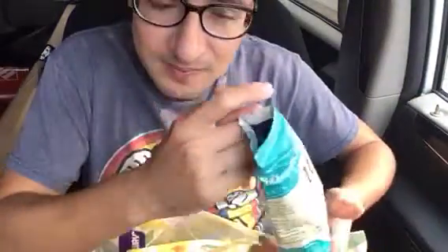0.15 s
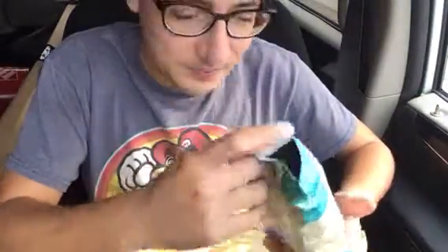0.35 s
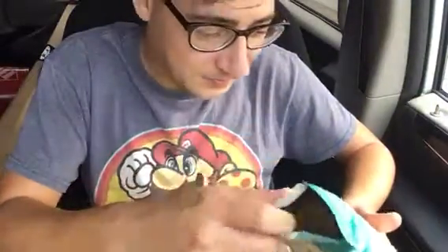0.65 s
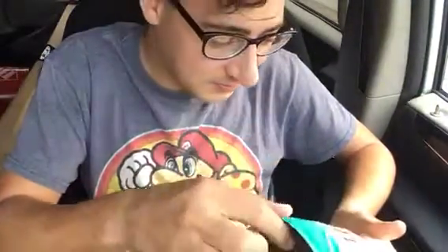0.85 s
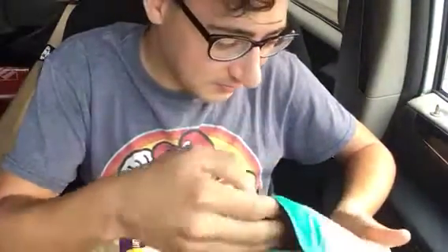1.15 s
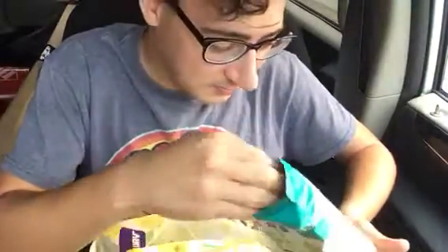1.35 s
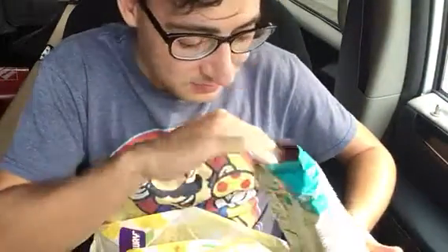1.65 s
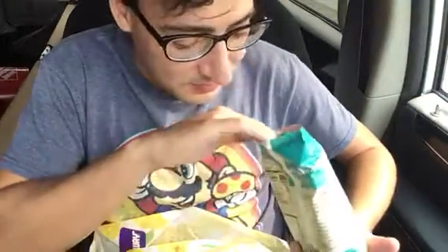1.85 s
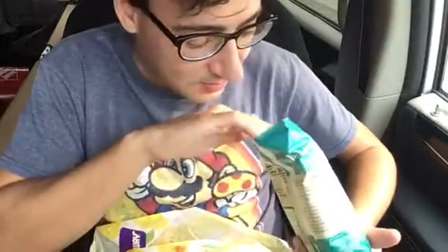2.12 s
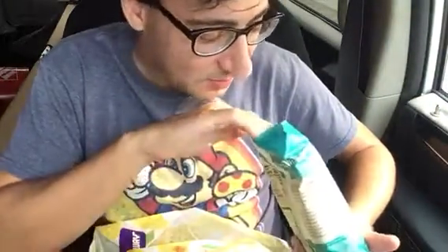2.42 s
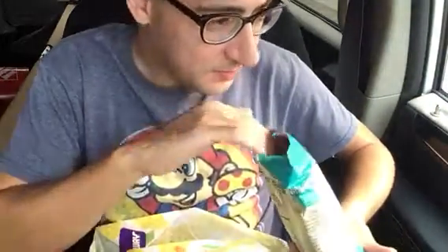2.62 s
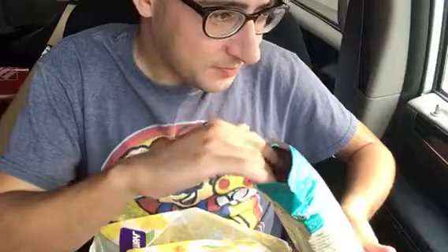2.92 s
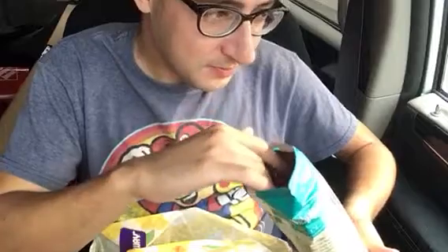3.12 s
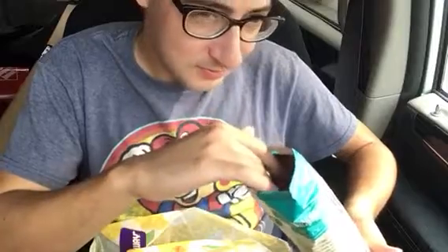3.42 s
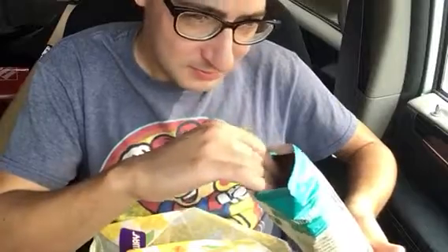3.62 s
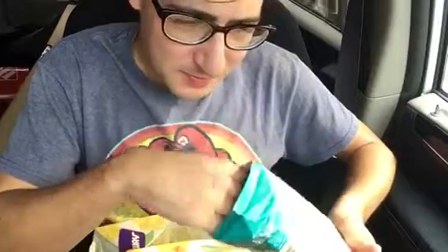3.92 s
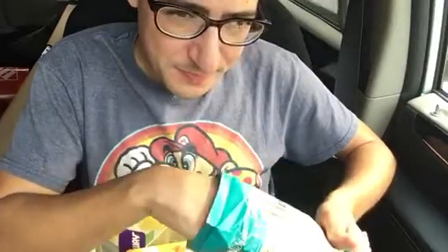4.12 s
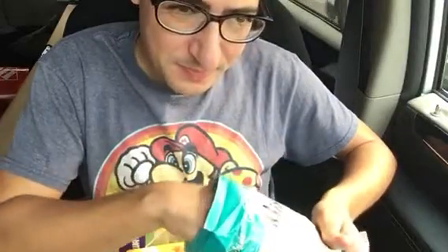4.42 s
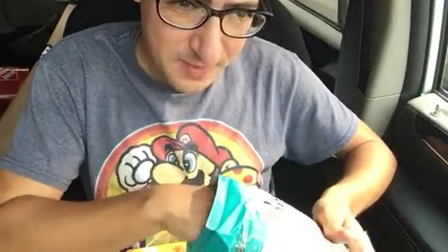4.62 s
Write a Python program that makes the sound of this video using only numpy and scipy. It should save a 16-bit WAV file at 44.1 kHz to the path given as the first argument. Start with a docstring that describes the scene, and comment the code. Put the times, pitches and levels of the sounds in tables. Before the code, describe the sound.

Close microphone in a small, padded cabin: a crinkly snack bag is handled in irregular strokes. Dry snaps with a papery, slightly hollow ring mix with fine foil rustling. Activity swells, almost stops in the middle, gives one brief burst, then ends in the loudest, brightest crackles with a low flutter of the bag wall. Deep soft rumble swells in the later half.

```python
"""Hand in a foil-lined chip bag, parked vehicle

A hand rummages in the bag, close by. Creases buckle: noise cracks and decaying scatter ring film and hollow.
Between them skin slides on foil: fine random ticks over smooth rub noise, with a low flutter of the bag wall.
The upholstered cabin adds a short tail of decaying noise. Below lie a noise rumble that grows late,
a wavering sine boom in swells, strongest in the second half, and faint air hiss.
"""
import sys
import numpy as np
from scipy import signal
from scipy.fft import rfft, irfft
from scipy.io import wavfile
from scipy.ndimage import map_coordinates

SR = 44100
rng = np.random.default_rng(int(sys.argv[2]) if len(sys.argv) > 2 else 0)


def master(y):
    """Save y as 16-bit WAV."""
    cut = np.clip(np.atleast_2d(y).T, -1, 1)
    pcm = np.round(cut * 32767)  # scale
    wavfile.write(sys.argv[1], SR, pcm.astype(np.int16))


N = 209871
TIME = np.arange(N) / SR

# buckling creases: t/s, film level/dB, hollow re film/dB, foil treble re film/dB, main resonance f/Hz
CREASE_SNAPS = [(0.028, -55, -7, 4.5, 8040), (0.0536, -68, -15, 8, 9500), (0.1192, -56.5, 5.5, -15, 1320),
                (0.1967, -57.5, -1, -23, 2080), (0.3003, -61.5, 7.5, -4, 1200),
                (0.3289, -54, -7, -0.5, 3470), (0.4313, -55.5, -6, 1, 9600), (0.5158, -58, 1, -2, 1140),
                (0.5485, -56, -21, 1, 3020), (0.561, -56, -11, 7.5, 1200), (0.5924, -45.5, -2, 9, 6960),
                (0.6035, -46.5, -7, -3, 3250), (0.7808, -47, -2.5, -22, 2220),
                (0.8173, -44.5, -22, -3, 2140), (0.8456, -45.5, -6.5, -3.5, 2820),
                (0.9294, -55.5, 5, -4, 1480), (0.9611, -48, -6.5, -2.5, 2200),
                (0.9886, -55, -1.5, -6, 1300), (1.083, -65, 13.5, -10, 1200), (1.1986, -57, 0, 10, 1220),
                (1.2405, -44.5, 0.5, -11, 1180), (1.2694, -42.5, -2.5, -1, 2380),
                (1.276, -42.5, -7, -13, 1340), (1.3121, -42, -3, -2.5, 1190), (1.3323, -46, 2, -16, 1560),
                (1.354, -48, -8, 0, 1108), (1.39, -52.5, -7, 8, 1100), (1.418, -43.5, -6, -3.5, 1240),
                (1.4348, -54, 0, -10, 1280), (1.442, -52.5, 8, -6, 1220), (1.4589, -47.5, -15, -3.5, 1880),
                (1.4843, -41, -3, -3, 1220), (1.598, -51, 5.5, -17, 1220), (1.67, -34, -6, 0, 1100),
                (1.7116, -43.5, -13, -3.5, 2900), (1.8106, -39, -0.5, 4, 1040),
                (1.8233, -41.5, -3, -5, 1080), (1.8413, -41.5, -1.5, -9, 804), (1.872, -40, 0, -3, 1110),
                (1.897, -49.5, 2, 2, 805), (1.9386, -44, -2, -13, 2500), (1.9548, -56, 12.5, -10, 940),
                (1.9947, -39.5, -5.5, 2, 1100), (2.0109, -37, -1, 0, 945), (2.0164, -44.5, -14, -2, 2740),
                (2.03, -46, -22, 4, 6300), (2.0673, -43.5, -3.5, 1, 991), (2.2237, -44.5, -2.5, -0.5, 930),
                (2.2993, -54, 0, -4, 1050), (2.3682, -62, 1.5, -0.5, 970), (2.708, -53, -3, 5, 1690),
                (2.7319, -48.5, -0.5, 0, 1070), (2.7557, -51.5, -3, -7, 2390),
                (2.7959, -46.5, -1, -2, 1290), (2.9283, -56, 8.5, -5, 1110), (2.9462, -64.5, 10, -15, 1100),
                (2.9678, -48, 0, -14, 2480), (3.033, -54.5, 6, -8, 1080), (3.0729, -43.5, -2, -1, 1020),
                (3.0848, -43.5, -1, 3, 880), (3.0885, -38, -1.5, 6, 960), (3.0945, -48, 8, 6, 960),
                (3.1185, -39.5, -3.5, -4, 2410), (3.2175, -59, 5, -15, 950), (3.3236, -61.5, 2, -2, 825),
                (3.3516, -51, 1, -12, 1740), (3.3606, -54.5, 6.5, -9, 1710), (3.395, -54, -3, -1, 2400),
                (3.5394, -45.5, -11, 2.5, 2650), (3.6356, -58, 3.5, -19, 2390), (3.648, -63, -5, -20, 2400),
                (3.8734, -54.5, 2, 7.5, 1110), (3.9007, -43.5, -2.5, -1, 1180),
                (3.9197, -38.5, 1.5, -6, 1100), (3.9347, -42, -1.5, 8, 1105), (3.9456, -38, -22, -6, 1670),
                (3.967, -39, -7.5, 0, 2670), (3.9884, -45.5, -1, 2, 1690), (4.0393, -42.5, -2.5, 0, 980),
                (4.077, -39.5, -5.5, -4.5, 4060), (4.1025, -42.5, 3.5, 3.5, 1195),
                (4.1283, -41.5, 1.5, -1, 1120), (4.1431, -34, -26, 5.5, 9800), (4.1634, -39, -7, 0, 9800),
                (4.171, -36, -7.5, 7, 9500), (4.188, -41.5, 1, 3, 1140), (4.2464, -30.5, -7, 7.5, 4120),
                (4.2587, -40.5, -7, -3, 1070), (4.2759, -46, 3.5, -21, 1230), (4.3297, -48, 1, -23, 1095),
                (4.3417, -41, -5, -9, 4160), (4.3744, -43.5, -8, -6, 1323), (4.3999, -33, -6.5, 0.5, 1211),
                (4.4717, -47, -2.5, -0.5, 1218), (4.4835, -51, -1, 7, 988), (4.5297, -47.5, -12, -20, 1000),
                (4.5672, -42, -4.5, -0.5, 1170), (4.6334, -47.5, -4, -2, 1280),
                (4.6899, -44.5, 4.5, -3, 1206), (4.6989, -36, -2, 0, 1310)]
# colour of the bag: f/Hz, level/dB
BAG_COLOUR = [(200, -3.5), (340, 1), (460, -9), (700, -1.5), (1000, -1.5), (1600, -4.5), (2500, 3),
              (4000, -1.5), (7000, -3), (9600, 0), (12500, 0), (15500, -5.5), (16500, -29)]
# resonances of the half-open bag: f/Hz, width/Hz, lift over the colour/dB (snaps take only a share of the lift)
BAG_RESONANCES = [(1137, 360, 13.5), (1770, 1200, 6), (3090, 98, 5.5), (3440, 620, 7), (4310, 450, 5.5),
                  (5600, 90, 4), (6240, 290, 1), (7800, 190, -3.5), (9700, 3200, 0.5), (10460, 610, -8.5),
                  (11900, 210, -0.5)]
# strokes of the hand: fastest t/s, rise/s, fall/s, film rustle level/dB, foil sizzle re film/dB
HAND_STROKES = [(0.23, 0.067, 0.11, -63.5, -1), (0.33, 0.063, 0.16, -62, -0.5),
                (0.58, 0.1, 0.15, -59.5, -4), (0.83, 0.16, 0.12, -56, -0.5), (1.0, .12, .15, -70.5, -1),
                (1.26, .25, .28, -52, -1.5), (1.74, 0.23, 0.28, -58, 1), (2.0, .08, 0.073, -53, 0.5),
                (2.19, 0.32, 0.19, -63, 0), (2.52, .15, 0.52, -71.5, -1), (2.74, 0.2, 0.24, -64, -1.5),
                (2.95, 0.1, 0.13, -64.5, -5.5), (3.1, 0.037, 0.052, -53, -3), (3.22, 0.056, 0.092, -69, -3),
                (3.37, 0.092, 0.062, -68, -10), (3.66, 0.041, 0.46, -78, 1), (3.96, 0.096, .17, -51, 1.5),
                (4.11, 0.063, .11, -49.5, -6), (4.17, .05, 0.11, -58, 6.5), (4.37, 0.099, 0.18, -55, 2),
                (4.59, 0.34, 0.36, -57, -1.5), (4.74, 0.19, .3, -50, -6)]
# colour of the rumble: f/Hz, level/dB
RUMBLE_SHAPE = [(18, -28), (30, -6.5), (42, -4), (55, 3.5), (72, -1), (95, -5), (120, -6), (140, -11.5),
                (205, -13.5), (250, -28), (350, -21), (450, -43), (900, -33), (2000, -56.5)]
# swells of the boom in the cabin air: loudest t/s, rise and fall/s, pitch f/Hz, level/dB
BOOM_SWELLS = [(.41, .4, 52.92, -48), (.75, .4, 58.3, -58), (2.8, .5, 59.1, -48.5), (3.22, .35, 61.08, -45),
               (3.47, .24, 59.44, -40.5), (4.05, 0.5, 58.25, -50), (4.56, 1.3, 61.5, -50.5)]
# colour of the faint cabin air: f/Hz, level/dB
AIR_COLOUR = [(300, 10.5), (600, 6.5), (1100, -6), (1800, -4.5), (4500, -12), (7000, -14), (9500, -9.5),
              (16000, -30)]

RUMBLE_DB, RUMBLE_GROWTH_DB, GROWTH_START_S = -49.3, 5.5, 3.6
BOOM_WAVER_HZ, WAVERS_PER_S = 2.32, 9
AIR_DB = -69.5
HOLLOW_TOP_HZ, FOIL_BOTTOM_HZ = 1700, 6000  # the film lies between
SNAP_LEVEL_S = .006  # snap levels hold over this first stretch
RING_S, RING_AT_DB, RING_HALVING_DB = 0.0058, -49, 41  # ring at that level; halves per so many dB more
CRACK_SHARE, CRACK_REF_DB = 0.11, -28  # power share in a weak snap; level that adds 1 before the cap
SMALL_PER_S, SMALL_DB, SMALL_SPREAD_DB = 15, -4.5, 7  # small creases: level re film rustle, scatter +/-
SMALL_HOLLOW_DB, SMALL_FOIL_DB, SMALL_HZ = 0.5, 6.5, 1296  # centres of their random values
REST_DB = -86.5  # rustle of the bag held still
TOP_HZ = 16200


def undb(db):
    """Decibels to gain."""
    return 10 ** (np.asarray(db) / 20)


def unit(x):
    """Scale to rms 1."""
    return x / np.sqrt(np.mean(x ** 2))


def colour(x, points, modes=(), size=16384):
    """Minimum-phase filter, via the cepstrum: (Hz, dB) outline plus resonances (Hz, width Hz, dB)."""
    f = np.fft.rfftfreq(size, 1 / SR)
    hz, db = np.transpose(points)
    shape_db = np.interp(np.log(f + 1), np.log(hz), db)
    for centre_hz, width_hz, lift_db in modes:
        shape_db = shape_db + lift_db / (1 + (2 * (f - centre_hz) / width_hz) ** 2)
    cepstrum = irfft(np.log(undb(shape_db)))
    # fold onto positive time: causal
    cepstrum[1:size // 2] *= 2
    cepstrum[size // 2 + 1:] = 0
    response = irfft(np.exp(rfft(cepstrum)))[:size // 2]
    return signal.fftconvolve(x, response)[:len(x)]


def band(x, edges_hz, kind, order=3):
    """Butterworth filter."""
    return signal.sosfilt(signal.butter(order, edges_hz, kind, fs=SR, output="sos"), x)


def swell(peak_s, rise_s, fall_s, db, round_top=0.26):
    """Power of a round-topped swell; its flanks steepen towards 20 dB per rise or fall time."""
    away = np.maximum((peak_s - TIME) / rise_s, (TIME - peak_s) / fall_s)
    return undb(db - 20 * (np.hypot(away, round_top) - round_top)) ** 2


def rumble():
    """Low rumble in the vehicle body: coloured noise that grows towards the end."""
    level_db = RUMBLE_DB + np.interp(TIME, [GROWTH_START_S, TIME[-1]], [0, RUMBLE_GROWTH_DB])
    return unit(colour(rng.standard_normal(N), RUMBLE_SHAPE)) * undb(level_db)


def boom():
    """Cabin air boom: a sine of wandering pitch, in swells."""
    peak_s, _, pitch_hz, _ = np.transpose(BOOM_SWELLS)
    wander = rng.standard_normal(128)
    waver_hz = BOOM_WAVER_HZ * np.interp(TIME * WAVERS_PER_S, np.arange(len(wander)), wander)
    hz = np.interp(TIME, peak_s, pitch_hz) + waver_hz
    power = sum(swell(s, length_s, length_s, db) for s, length_s, _, db in BOOM_SWELLS)
    tone = np.sin(2 * np.pi * (np.cumsum(hz) / SR + rng.random()))
    return unit(tone) * np.sqrt(power)


def air():
    """Faint cabin hiss: steady coloured noise."""
    return undb(AIR_DB) * unit(colour(rng.standard_normal(N), AIR_COLOUR))


def slide():
    """Film and foil rustle levels in dB: powers of the hand's strokes add up over the rest level."""
    film = foil = undb(REST_DB) ** 2
    for peak_s, rise_s, fall_s, db, foil_db in HAND_STROKES:
        power = swell(peak_s, rise_s, fall_s, db)
        film = film + power
        foil = foil + power * undb(foil_db) ** 2
    return 10 * np.log10(film), 10 * np.log10(foil)


def small_creases(hollow_spread_db=5, foil_spread_db=6, pitch_spread=1.77):
    """Lesser creases give way at random, as strong as the hand moves; rows as in CREASE_SNAPS."""
    film_db, _ = slide()
    rows = []
    for when, *own in rng.random((int(SMALL_PER_S * N / SR), 5)):
        size, hollow, foil, pitch = 2 * np.array(own) - 1
        level_db = film_db[int(when * N)] + SMALL_DB + SMALL_SPREAD_DB * size
        hollow_db = SMALL_HOLLOW_DB + hollow_spread_db * hollow
        foil_db = SMALL_FOIL_DB + foil_spread_db * foil
        rows.append((when * TIME[-1], level_db, hollow_db, foil_db, SMALL_HZ * pitch_spread ** pitch))
    return rows


def facets(main_hz, main_db=9, low_hz=1300, high_hz=11000, relative_width=.22, lift_db=5.5, count=3):
    """Flat patches round a crease ring at own pitches, one lifted most: (Hz, width Hz, dB)."""
    others_hz = low_hz * (high_hz / low_hz) ** ((np.arange(count) + rng.random(count)) / count)
    return [(main_hz, relative_width * main_hz, main_db)] + [
        (hz, relative_width * hz, lift_db) for hz in others_hz]


def snap(hollow_db, foil_db, crack, ring_s, main_hz, bag_share=0.56, grain=0.66, size=2600):
    """One crease flips: a crack, then bending waves scatter through the film and die away."""
    crack_s, rise_share = .0002, .04
    t = np.arange(size) / SR
    crack_noise, ring_noise, grain_noise = rng.standard_normal((3, size))
    # creases on the outside drive the bag's resonances only in part
    modes = [(hz, width_hz, bag_share * db) for hz, width_hz, db in BAG_RESONANCES] + facets(main_hz)
    crack = min(crack, .8)
    strike = unit(crack_noise * np.exp(-t / crack_s))
    # a crease that hardly cracks rolls over: its ring swells more slowly
    onset = 1 - np.exp(-t / (rise_share * ring_s * (1 - crack)))
    scatter = unit(ring_noise * np.exp(grain * grain_noise) * onset * np.exp(-t / ring_s))
    mixed = np.sqrt(crack) * strike + np.sqrt(1 - crack) * scatter
    sharp = colour(mixed, BAG_COLOUR, modes, size=2048)
    # the air in the bag answers the whole sheet, not the crack
    sheet = colour(scatter, BAG_COLOUR, modes, size=2048)
    hollow = band(sheet, [320, HOLLOW_TOP_HZ], "bandpass")
    film = band(sharp, [HOLLOW_TOP_HZ, FOIL_BOTTOM_HZ], "bandpass")
    foil = band(sharp, FOIL_BOTTOM_HZ, "highpass")
    head = int(SNAP_LEVEL_S * SR)
    parts = (hollow, hollow_db), (film, 0), (foil, foil_db)
    return sum(undb(db) * part / np.std(part[:head]) for part, db in parts)


def snaps():
    """All buckling creases; the tauter it was, the louder, harder and shorter its snap."""
    out = np.zeros(N + SR)
    for s, db, hollow_db, foil_db, main_hz in list(CREASE_SNAPS) + small_creases():
        crack = CRACK_SHARE + undb(db - CRACK_REF_DB) ** 2
        ring_s = RING_S * 2 ** ((RING_AT_DB - db) / RING_HALVING_DB)
        sound = undb(db) * snap(hollow_db, foil_db, crack, ring_s, main_hz)
        start = int(s * SR)
        out[start:start + len(sound)] += sound
    return out[:N]


def depth(enter_s=3.676, push_s=0.72):
    """How far the hand is inside the bag, 0-1."""
    return np.clip((TIME - enter_s) / push_s, 0, 1)


def crinkle(per_s=440, most_db=15, tint_db=4, rub_db=0.0, size=384):
    """Tiny wrinkles tick at random, each of its own brightness, over the rub of skin; film and foil parts."""
    ring_s, spread_db, grip_db = .0014, 4.8, -6
    count = int(per_s * N / SR)
    when, strength, tint = rng.random((count, 3)).T
    # dB sizes are exponentially spread, capped at most_db
    sizes = undb(np.minimum(-spread_db * np.log(1 - strength), most_db))[:, None]
    tints = undb(tint_db * (2 * tint - 1))[:, None]
    ticks = rng.standard_normal((count, size)) * np.exp(-np.arange(size) / SR / ring_s)
    places = ((when * N).astype(int)[:, None] + np.arange(size)).ravel()
    film, foil = (np.bincount(places, (ticks * gains).ravel(), N)[:N]
                  for gains in (sizes * tints, sizes / tints))
    # fingers at the rim glide smoothly; the whole hand inside crushes more than it rubs
    rub = undb(rub_db + grip_db * depth())
    return [(unit(p) + rub * rng.standard_normal(N)) / np.hypot(1, rub) for p in (film, foil)]


def folds(x, near_s=0.00132, far_s=.0023, echo=0.39, drift=0.252, per_s=11):
    """Sound bounces between the bag's walls: two echoes of wandering lag shift the ripple in its colour."""
    knots = np.linspace(0, TIME[-1], int(per_s * TIME[-1]) + 2)
    out = x
    for lag_s in (near_s, far_s):
        wall = np.interp(TIME, knots, rng.uniform(-0.76, 1, len(knots)))
        moving_lag_s = lag_s * (1 + drift * wall)
        out = out + echo * map_coordinates(x, [(TIME - moving_lag_s) * SR], order=3)
    return out


def rustle(dull_hz=4200, soft_hz=11500):
    """Crinkle follows the sliding hand and sounds through the same bag, duller than the snaps."""
    film_db, foil_db = slide()
    film, foil = (colour(folds(p), BAG_COLOUR, BAG_RESONANCES) for p in crinkle())
    film = band(film, [650, FOIL_BOTTOM_HZ], "bandpass")
    film = band(film, dull_hz, "lowpass", order=1)
    foil = band(foil, FOIL_BOTTOM_HZ, "highpass")
    foil = band(foil, soft_hz, "lowpass", order=1)
    return unit(film) * undb(film_db) + unit(foil) * undb(foil_db)


def flex(centre_hz=350, spread=1.41, flex_db=-14, deep_db=5):
    """The whole bag wall bends with a soft, low flutter, stronger once the hand is deep inside."""
    film_db, _ = slide()
    wrinkles, _ = crinkle()
    flutter = unit(band(wrinkles, [centre_hz / spread, centre_hz * spread], "bandpass", order=2))
    return flutter * undb(film_db + flex_db + deep_db * depth())


def cabin(x, wet_db=-13, t60_s=0.12, gap_s=0.0026, dull_hz=7000):
    """Windows and seats return a short, duller tail: decaying noise after a gap."""
    t = TIME[:SR // 3]
    fade_in = np.clip(t / gap_s - 1, 0, 1)
    tail = rng.standard_normal(len(t)) * undb(-60 * t / t60_s) * fade_in
    tail = band(tail / np.linalg.norm(tail), dull_hz, "lowpass", order=1)
    return x + undb(wet_db) * signal.fftconvolve(x, tail)[:N]


def scene():
    """The bag in the cabin, over rumble, boom and air."""
    background = rumble() + boom() + air()
    bag = snaps() + rustle() + flex()
    return (background + cabin(bag))[None]


def record(dry):
    """The recorder cuts the top: steep elliptic low-pass."""
    return signal.sosfilt(signal.ellip(8, .2, 70, TOP_HZ, fs=SR, output="sos"), dry)


dry = scene()
out = record(dry)
master(out)
```